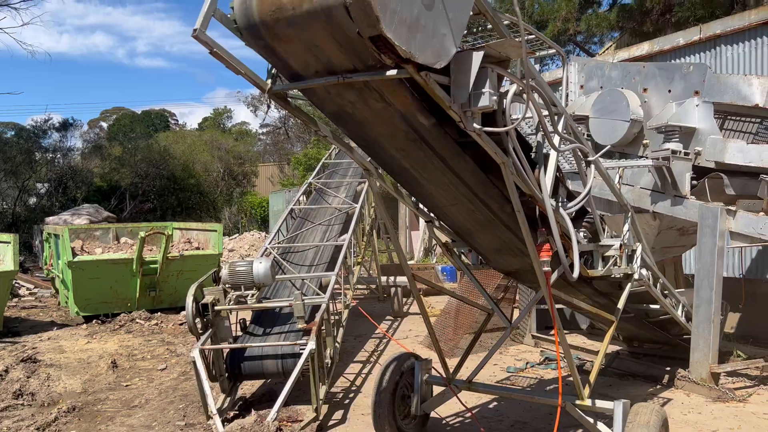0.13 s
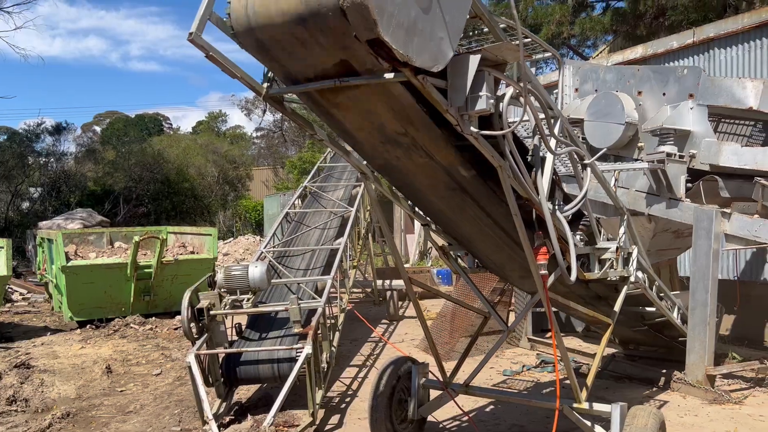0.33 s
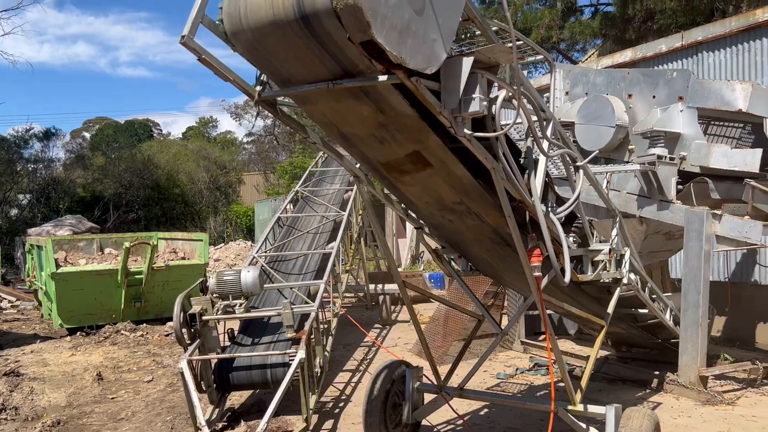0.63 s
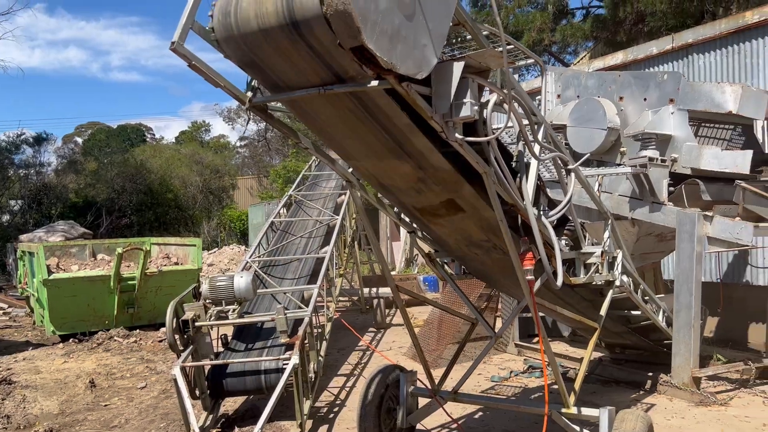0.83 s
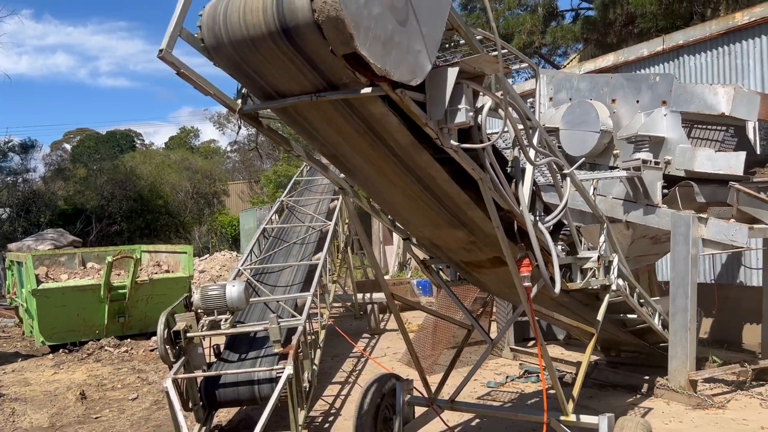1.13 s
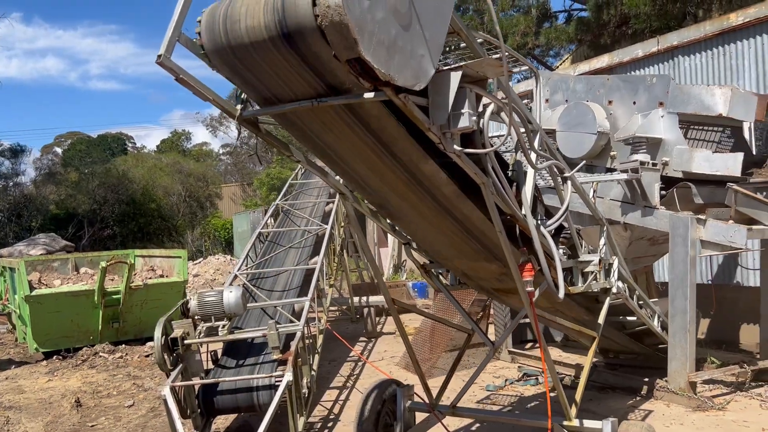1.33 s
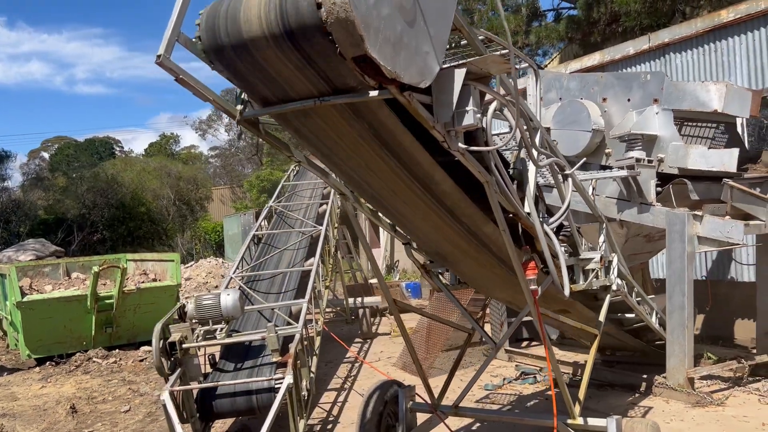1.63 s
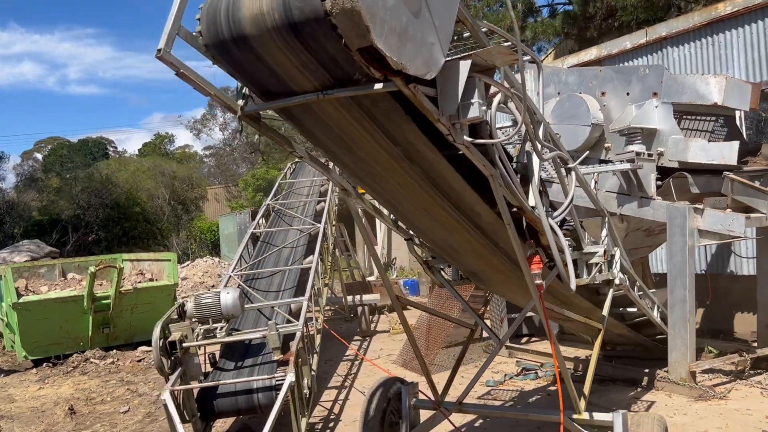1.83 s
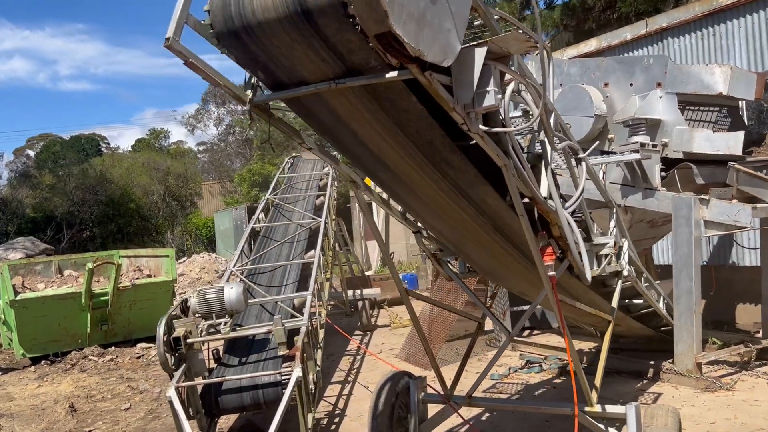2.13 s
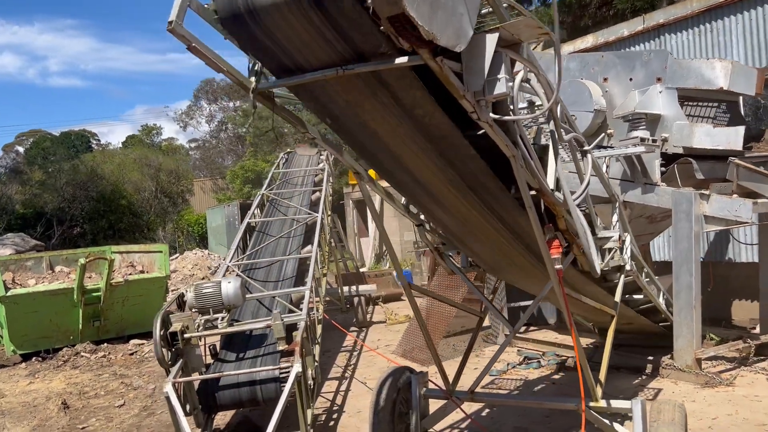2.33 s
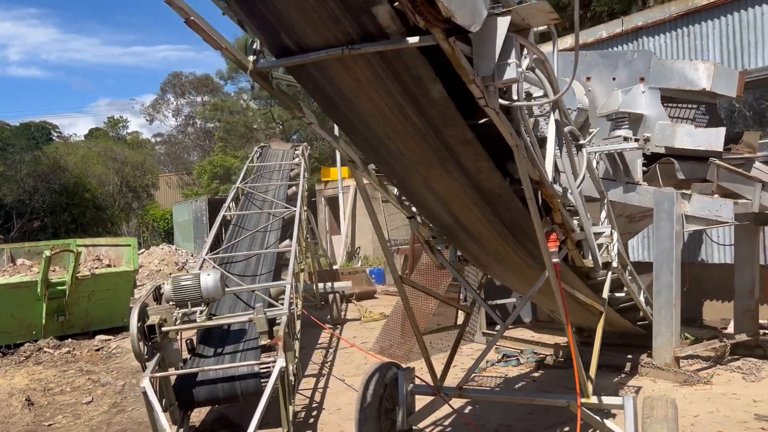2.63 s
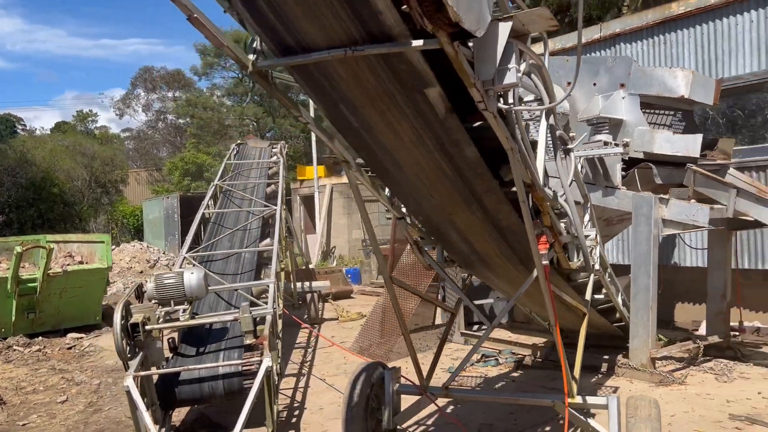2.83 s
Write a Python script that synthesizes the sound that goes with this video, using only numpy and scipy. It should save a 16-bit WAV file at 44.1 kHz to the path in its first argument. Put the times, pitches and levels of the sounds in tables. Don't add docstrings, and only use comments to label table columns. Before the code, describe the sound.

Running conveyor machine in an open yard: broad steel rumble, wavering hums and sharp rattling clacks

```python
import sys
import numpy as np
from scipy import signal
from scipy.fft import rfft, irfft, next_fast_len
from scipy.io import wavfile
from scipy.ndimage import uniform_filter1d

SR = 44100
rng = np.random.default_rng(int(sys.argv[2]) if len(sys.argv) > 2 else 0)


def to_linear_factor(level_db):
    exponent = np.asarray(level_db, float) / 20
    return 10 ** exponent


def file_out(sig):
    cols = np.atleast_2d(sig).T
    lim = np.clip(cols, -1, 1)
    pcm = np.round(lim * 32767).astype(np.int16)
    wavfile.write(sys.argv[1], SR, pcm)


N = 130977

# (time [s], level [dB])
LOAD_LEVEL = [(0.05, -21.5), (0.24, -19), (0.45, -22.5), (0.46, -19), (0.87, -23), (0.97, -20.5),
              (2.2, -20.5), (2.21, -19.5), (2.62, -23), (2.68, -25), (2.8, -19.5), (2.96, -21)]
# (frequency [Hz], level [dB per Hz])
RUMBLE_TONE = [(25, -50), (40, -35), (100, -17.5), (230, -8), (500, -5.5), (1270, -13.5), (2050, -20.5),
               (2500, -30.5)]
# (frequency [Hz], width [Hz], level against the load [dB])
FRAME_RESONANCES = [(47.5, 3.6, -30), (82.7, 4.6, -29), (156.3, 10.6, -21), (196.3, 10, -22.5),
                    (241, 8.6, -17.5), (525.6, 18, -12), (586, 36, -10.5), (626, 22, -17), (825, 53, -17.5),
                    (1031.5, 17.5, -15), (1492, 13, -22), (1695, 6.5, -24.5), (1980, 5.9, -23)]
# (time [s], level [dB])
LOW_HUM_LEVEL = [(0.05, -26.5), (0.31, -20), (0.42, -29), (0.75, -31), (0.79, -37.5), (1.03, -22.5),
                 (1.06, -37), (1.3, -29), (2.58, -30.5), (2.62, -25), (2.9, -53), (2.96, -32)]
MIDDLE_HUM_LEVEL = [(0.05, -28), (0.57, -33), (0.6, -28), (0.69, -46), (1.01, -25.5), (1.23, -35),
                    (1.29, -25.5), (2.02, -38.5), (2.53, -22.5), (2.66, -32), (2.85, -27.5), (2.96, -37)]
HIGH_HUM_LEVEL = [(0.05, -27.5), (0.22, -21.5), (0.33, -32), (0.49, -20.5), (0.51, -28.5), (1.03, -34),
                  (1.07, -20.5), (1.31, -39), (1.86, -36), (1.97, -47), (2.68, -31.5), (2.96, -50)]
# (time [s], level [dB])
GEAR_LEVEL = [
    (.05, -29.5),
    (.5, -29.5),
    (1.0, -30.5),
    (1.35, -35.5),
    (1.5, -36.5),
    (2.2, -32.5),
    (2.6, -34),
    (2.96, -34),
]
# (frequency [Hz], level [dB per Hz])
HISS_TONE = [(1500, -15.5), (2400, 3), (4000, -5.5), (6500, -7.5), (8600, -5.5), (10000, -10),
             (13000, -17.5), (15600, -10)]
# (time [s], level [dB], rattle length [s], brightness [dB], loudest ring [Hz])
JOINT_CLACKS = [(.114, -23, 0.023, -1.5, 8600), (.186, -29, .02, 0, 3230), (0.277, -17.5, 0.02, -0.5, 8600),
                (0.4294, -12, 0.022, 2.5, 8400), (0.46, -23, 0.02, -14, 2860), (0.556, -12, .02, 0, 3220),
                (0.676, -24, 0.024, -3, 8600), (0.878, -19.5, 0.015, 2, 8600),
                (1.041, -11.5, 0.025, -0.5, 8650), (1.095, -20, 0.045, -4.5, 1815),
                (1.173, -16, 0.025, 0, 3240), (1.533, -16, 0.014, 0.5, 8210),
                (1.649, -13.5, 0.027, 2, 8210), (1.68, -19, 0.02, -10, 2900), (1.768, -14, .018, 2.5, 8210),
                (1.995, -27.5, 0.017, 1.5, 8600), (2.082, -26, 0.026, -2, 2420),
                (2.23, -7, 0.038, -0.7, 8690), (2.3652, -8, 0.024, -1.5, 4480),
                (.775, -30.5, 0.019, 2, 8600), (2.7275, -10.5, 0.023, -1, 8340),
                (2.842, -13.5, 0.029, 2, 8210)]
# (frequency [Hz], level [dB per Hz])
CLACK_COLOUR = [(120, -31), (500, 2.5), (1500, -0.5), (4000, -5.5), (6200, -7.5), (8500, -4.5), (11000, -7),
                (16000, -35)]
# (frequency [Hz], width [Hz], level [dB])
BRACKET_RINGS = [(1540, 50, -24), (1815, 44, -6.5), (2440, 25, -15), (2863, 22, -6), (3240, 38, -12),
                 (3250, 33, -30), (4480, 19, -7.5), (4940, 26, -6), (6210, 70, -15), (6700, 79, -7),
                 (7500, 200, -8), (8210, 270, -6.5), (8130, 150, -13.5), (11800, 120, -38)]
# (frequency [Hz], side minus mid [dB])
STEREO_WIDTH = [(60, -24), (200, -20), (380, -17), (700, -10), (1290, -7.5), (2380, -8.5), (4400, -7.5),
                (7000, -8)]
# (frequency [Hz], left minus right [dB])
STEREO_LEAN = [(100, .1), (250, -.3), (600, -2.2), (1200, -1.7), (1900, -1.8), (2700, 1.4), (6500, 2.1),
               (9000, .01)]
# (frequency [Hz], lead [turns])
LEFT_LEAD = [(250, -.01), (700, -.04), (1500, .001), (3100, .11), (4300, .05), (6300, .03), (7600, .11),
             (8450, .001)]
TREBLE_NULLS = [8450, 10170, 12150, 13800, 15600]


def table(rows, x, log=True):
    a = np.array(rows, float)
    if log:
        return np.interp(np.log(x + 1), np.log(a[:, 0]), a[:, 1])
    return np.interp(x, a[:, 0], a[:, 1])


def unit(x):
    return x / np.sqrt(np.mean(x ** 2))


def colour(x, rows):
    cepstrum = irfft(np.log(to_linear_factor(table(rows, np.arange(1025) * SR / 2048))))
    cepstrum[1:1024] *= 2
    cepstrum[1025:] = 0
    response = irfft(np.exp(rfft(cepstrum)))
    return signal.fftconvolve(x, response[None], axes=1)[:, :N]


def ring(x, hz, width_hz):
    return signal.lfilter(*signal.iirpeak(hz, hz / width_hz, fs=SR), x)


def walk(rate):
    hold = int(SR / rate)
    steps = np.repeat(rng.standard_normal(N // hold + 1), hold)
    drift = uniform_filter1d(uniform_filter1d(steps, hold), hold)[:N]
    return (drift - drift.mean()) / drift.std()


def noise():
    return rng.standard_normal((2, N))


def clicks(per_s, scatter_db):
    chance, luck = rng.random((2, N))
    size = to_linear_factor(-scatter_db * np.log(luck + 0.007))
    return unit((chance < per_s / SR) * size * np.sign(noise()))


def rumble(t):
    rumble_db, swell_db, flicker_db, frame_wander_db = -2, 1.4, 1, 1.6
    swell = walk(8.34)
    broad = 0
    for hz in 28 * 2 ** np.arange(0, 6.4, 1 / 3):
        db = table(RUMBLE_TONE, hz) + swell_db * swell + flicker_db * walk(15)
        broad = broad + to_linear_factor(db) * ring(ring(noise(), hz, hz / 3.7), hz, hz / 3.7)
    frame = 0
    for hz, width_hz, db in FRAME_RESONANCES:
        frame = frame + to_linear_factor(db + frame_wander_db * walk(3.83)) * unit(ring(noise(), hz, width_hz))
    return to_linear_factor(table(LOAD_LEVEL, t, False)) * (to_linear_factor(rumble_db) * unit(broad) + frame)


def hums(t):
    out = 0
    levels = [LOW_HUM_LEVEL, MIDDLE_HUM_LEVEL, HIGH_HUM_LEVEL]
    for hz, width_hz, level in zip([320.5, 450.8, 718.5], [8.4, 6.1, 25], levels):
        line = unit(ring(noise(), hz, width_hz))
        swing = np.sqrt(uniform_filter1d(line ** 2, size=600) + 0.058)
        out = out + to_linear_factor(table(level, t, False) + 0.5) * unit(line / swing ** 0.64)
    return out


def gear(t):
    hz, width_hz, gear_db, throb_db = 1815, 230, -3.5, 1.5
    band = ring(ring(noise(), hz, width_hz), hz, width_hz)
    return unit(band) * to_linear_factor(table(GEAR_LEVEL, t, False) + gear_db + throb_db * walk(30))


def hiss():
    hiss_db, chatter_db, chatter_per_s = -40.5, -42.5, 660
    chatter = colour(clicks(chatter_per_s, 1.85) * to_linear_factor(2.3 * walk(5.9)), CLACK_COLOUR)
    rubbing = to_linear_factor(hiss_db + 1.44 * walk(10.3)) * unit(colour(noise(), HISS_TONE))
    return rubbing + to_linear_factor(chatter_db) * unit(chatter)


def clacks(t):
    clack_db, bright_hz = -15.5, 5660
    tick_db, tick_s, rise_s = -2.5, .002, 0.0093
    tail_db, tail_t60_s, bright_tail_db = -3, 0.65, -3.5
    ring_db, favour_db, ring_late_s = -7, 7, .008
    dull, bright = np.zeros(N), np.zeros(N)
    rings = np.zeros((len(BRACKET_RINGS), N))
    tones_hz = np.array(BRACKET_RINGS)[:, 0]
    picks = rng.standard_normal((len(JOINT_CLACKS), len(BRACKET_RINGS)))
    for (s, db, length_s, bright_db, loudest_hz), pick in zip(JOINT_CLACKS, picks):
        age = np.maximum(t - s, 0)
        level = to_linear_factor(db + clack_db)
        size = (t > s) * level
        fade = np.exp(-(age / max(length_s, .004)) ** 2)
        burst = (.6 + .6 * np.minimum(age / rise_s, 1)) * fade
        tick = to_linear_factor(tick_db) * np.exp(-age / tick_s)
        tail = to_linear_factor(tail_db - 60 * age / tail_t60_s)
        dull = dull + size * (burst + tail)
        bright = bright + size * to_linear_factor(bright_db) * (tick + burst + tail * to_linear_factor(bright_tail_db))
        distance_hz = np.abs(tones_hz - loudest_hz)
        tone_db = ring_db + favour_db * (distance_hz == distance_hz.min())
        tone_db = tone_db + 3.6 * np.clip(pick, -2, 1.5) + bright_db * (tones_hz > bright_hz)
        late_burst = burst * np.minimum(age / ring_late_s, 1) ** 2
        rings += np.outer(to_linear_factor(tone_db), level * late_burst)
    rattle = clicks(per_s=3500, scatter_db=2.5) + .9 * noise()
    rattle = unit(rattle) * to_linear_factor(1.8 * walk(150))
    body = unit(colour(rattle, CLACK_COLOUR))
    low = signal.sosfilt(signal.butter(2, bright_hz, fs=SR, output="sos"), body)
    metal = 0
    for (hz, width_hz, db), strength in zip(BRACKET_RINGS, rings):
        even_out = np.sqrt(SR / 2 / width_hz)
        metal = metal + to_linear_factor(db) * even_out * ring(rattle * strength, hz, width_hz)
    return low * dull + (body - low) * bright + metal


def scene():
    loose_share, treble_side_db = .3, 1
    t, size = np.arange(N) / SR, next_fast_len(N + 4096)
    hz = np.arange(size // 2 + 1) * SR / size
    mid, side = rfft(rumble(t) + hums(t) + gear(t) + hiss() + clacks(t), size)
    turns = np.where(hz < TREBLE_NULLS[0], table(LEFT_LEAD, hz), np.interp(hz, TREBLE_NULLS, -np.arange(5) / 2))
    half = np.pi * turns
    fold = np.clip((hz - 7000) / 2900, 0, 1)
    treble_loose = np.sqrt(loose_share) * np.abs(np.sin(2 * half) * np.sin(half))
    loose = (1 - fold) * to_linear_factor(table(STEREO_WIDTH, hz)) + fold * treble_loose
    tied = 1j * np.sin(half) * mid * np.sqrt(1 - fold * loose_share * np.sin(2 * half) ** 2)
    side = (tied + loose * side) * to_linear_factor(fold * treble_side_db)
    mid = mid * np.cos(half)
    lean = to_linear_factor(table(STEREO_LEAN, hz) / 2)
    return irfft(np.array([(mid + side) * lean, (mid - side) / lean]), size)[:, :N]


def band_limit(x):
    return signal.sosfilt(signal.butter(12, 17110, fs=SR, output="sos"), x)


def record(dry):
    top_hz, start_s, fade_in_s = 15800, .0352, .0004
    rounded = np.tanh(1.1 * dry) / 1.1
    x = signal.sosfilt(signal.ellip(10, .3, 70, top_hz, fs=SR, output="sos"), rounded)
    x = x * np.clip((np.arange(N) / SR - start_s) / fade_in_s, 0, 1)
    return band_limit(x)


dry = scene()
out = record(dry)
file_out(out)
```